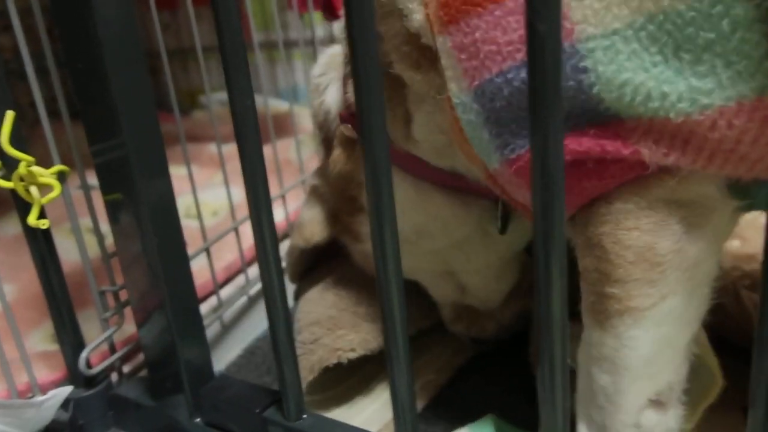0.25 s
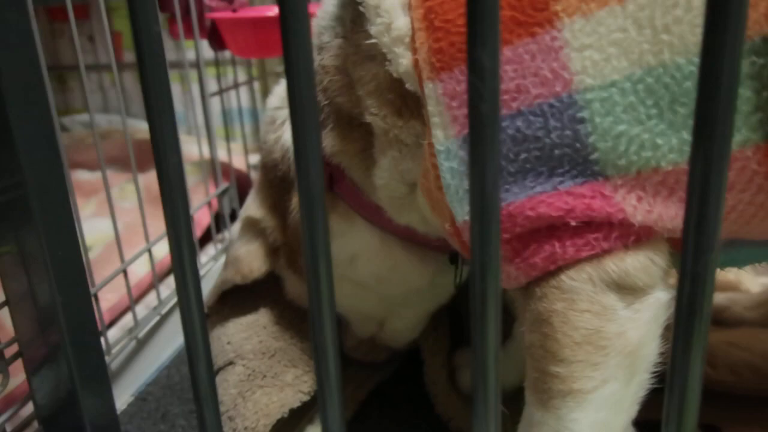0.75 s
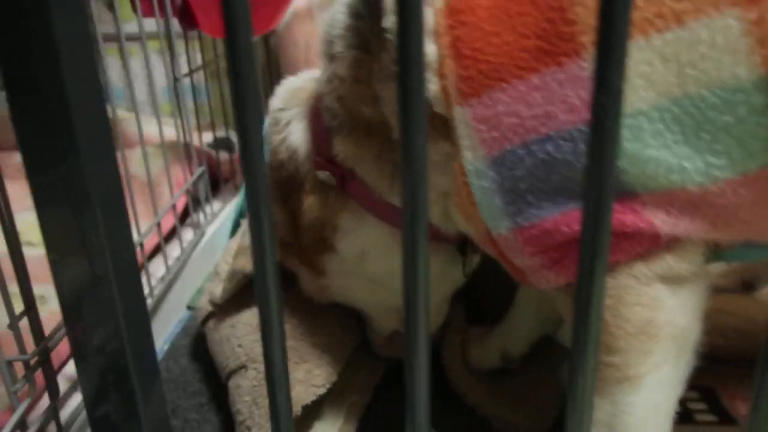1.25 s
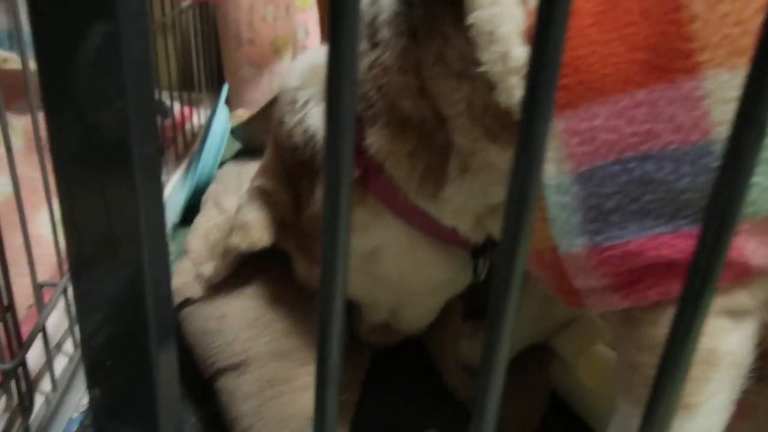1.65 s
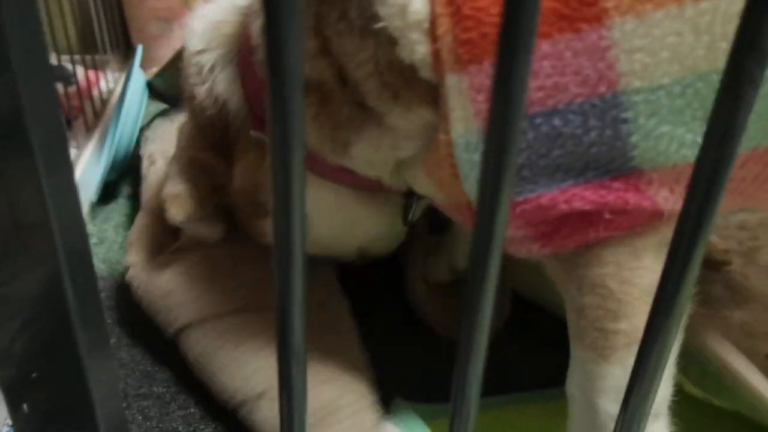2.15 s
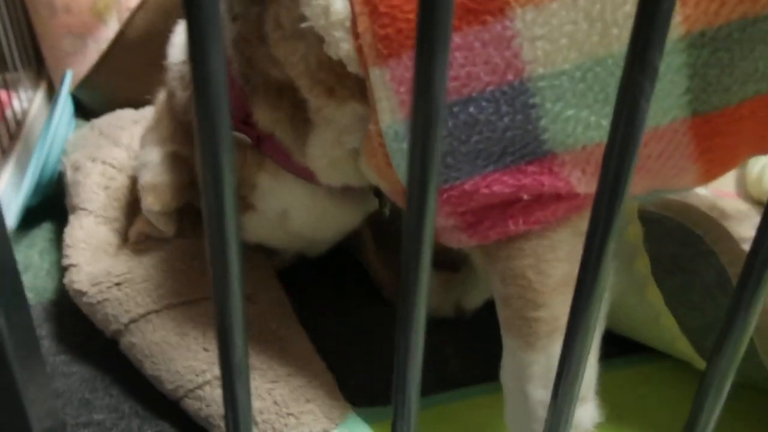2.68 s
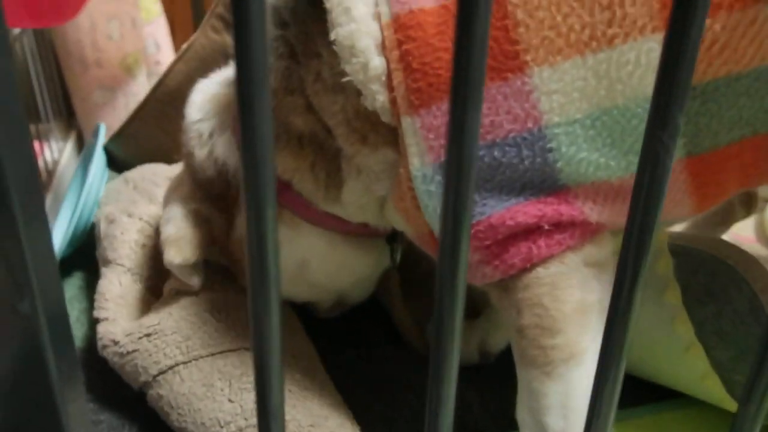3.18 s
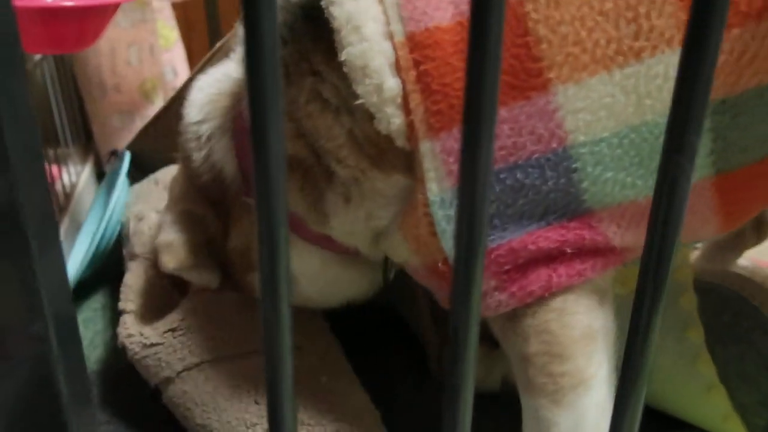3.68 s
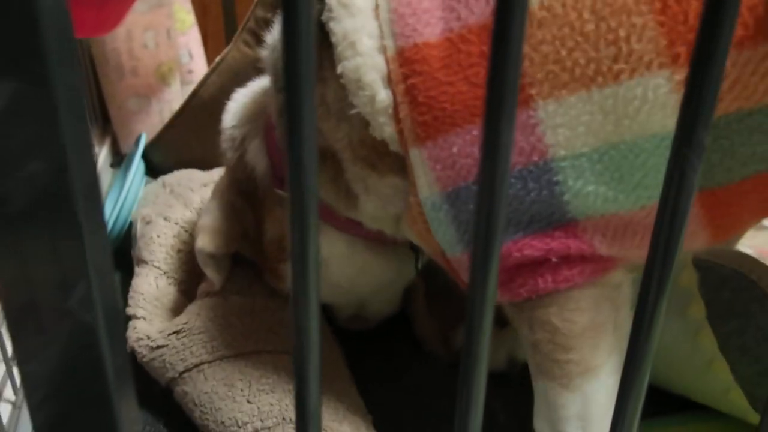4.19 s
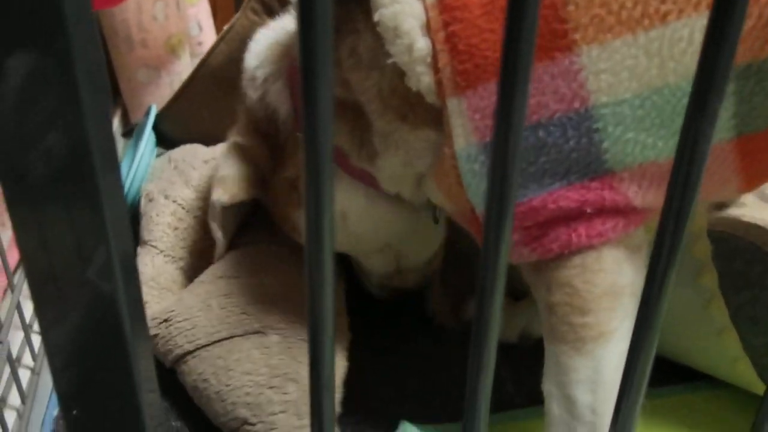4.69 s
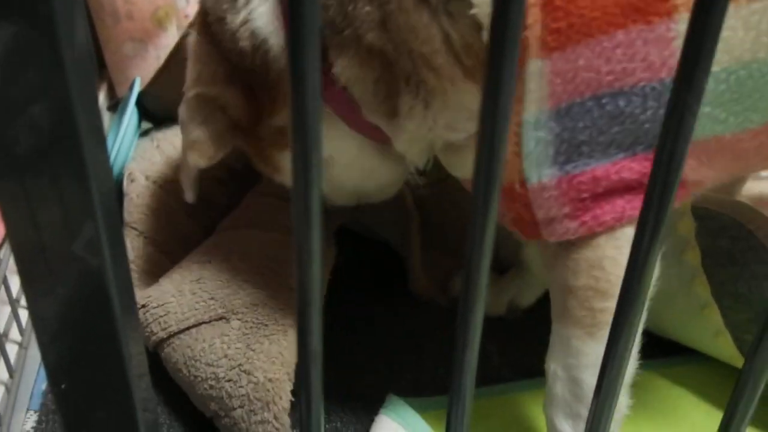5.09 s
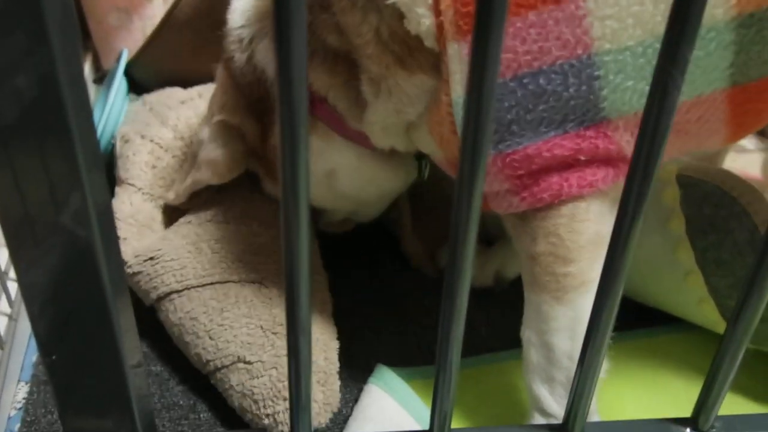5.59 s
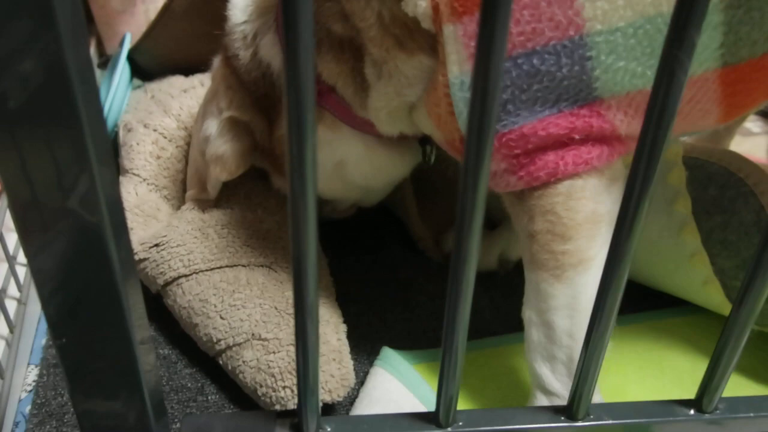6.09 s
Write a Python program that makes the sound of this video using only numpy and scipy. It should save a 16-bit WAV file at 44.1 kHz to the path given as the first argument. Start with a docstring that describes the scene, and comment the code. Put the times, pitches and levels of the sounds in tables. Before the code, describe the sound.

A steady faint hum and airy fan sit behind a dog rooting in bedding. Soft thuds and fleece shuffle come first, then lip smacks and breathy sniffs. The loudest part is cloth jerking and scraping over the hard crate floor, with rapid snaps and rasping weave. Later come sticky mouth clicks, hard snorts and quiet rustle. Close stereo microphone, almost no echo.

```python
"""A dog noses and digs into fleece bedding in a wire crate, indoors, close by, over a steady mains hum and fan.
It opens with a shove of the fleece and soft pats, then small wet nibbles, snuffling and a claw knock.
From about 1.5 s cloth drags and catches on the crate floor, ringing its damped modes, and the weave rasps.
After a second knock near 2.9 s come crackling nibbles, then hard snorts through the nose around 4.5 s.
Sparse wet clicks and faint fleece rustle, made of filtered grains, close the scene."""
import sys
import numpy as np
from scipy import signal
from scipy.fft import rfft, irfft
from scipy.io import wavfile
from scipy.ndimage import uniform_filter1d

SR = 44100
rng = np.random.default_rng(int(sys.argv[2]) if len(sys.argv) > 2 else 0)


def transcribe(signal):
    """Save signal, clipped to [-1, 1], as a 16-bit WAV file at the path in sys.argv[1]."""
    frames = np.atleast_2d(signal).T
    limited = np.clip(frames, -1, 1)
    pcm = np.round(limited * 32767).astype(np.int16)
    wavfile.write(sys.argv[1], SR, pcm)


N = 279798
TIME = np.arange(N) / SR
# In the tables, level_db is a drive level: the playing function adds its own gains.
# Mode tables: side_db is left over right, side_phase_rad is the phase between the sides.


def from_db(db):
    """Decibels to gain."""
    return 10 ** (np.asarray(db) / 20)


def rms_one(x):
    """Scale to unit rms."""
    return x / np.sqrt(np.mean(x ** 2) + 1e-20)


def coloured(x, colour):
    """Give a steady signal a spectrum, drawn through the colour's points on a log-frequency axis; rms 1."""
    hz, db = np.transpose(colour)
    bins = np.maximum(np.arange(N // 2 + 1) * SR / N, 1)
    gain = from_db(np.interp(np.log(bins), np.log(hz), db))
    return rms_one(irfft(rfft(x) * gain, N))


def noise():
    """White noise."""
    return rng.standard_normal(N)


def drift(rate):
    """Smooth random wander of rms 1, with `rate` new points a second."""
    return rms_one(np.interp(TIME * rate, np.arange(N), noise()))


def grains(per_s, spread_db):
    """Fibres let go at random: tiny clicks of either sign and uneven size; rms 1."""
    sizes = from_db(spread_db * np.minimum(rng.exponential(1, N), 4))
    signed = sizes * rng.choice([-1, 1], N)
    return rms_one(signed * (rng.random(N) < per_s / SR))


def clicks(times, heights):
    """One impulse at each time."""
    out = np.zeros(N)
    np.add.at(out, np.round(np.asarray(times) * SR).astype(int), heights)
    return out


def low_pass(x, hz, order=2):
    """Soften above a frequency."""
    return signal.sosfilt(signal.butter(order, min(hz, .45 * SR), fs=SR, output="sos"), x + 1e-18)


def ring(force, hz, db, t60, pan_db, phase):
    """One damped mode, driven by the force near its own pitch; each side gets its own level and phase."""
    near = signal.butter(1, [hz / 2, min(hz * 2, .4 * SR)], "band", fs=SR, output="sos")
    pole = np.exp((2j * np.pi * hz - np.log(1000) / t60) / SR)
    wave = signal.lfilter([from_db(db)], [1, -pole], signal.sosfilt(near, force + 1e-18))
    turn = np.exp(.5j * phase) * from_db(pan_db / 2)
    return np.array([(wave * turn).imag, (wave / turn).imag])


def body(force, modes):
    """All modes of a thing under one force, with alternating sign."""
    return sum((-1) ** k * ring(force, *mode) for k, mode in enumerate(modes))


def damped(modes, cycles):
    """Soft stuff lying against a thing caps every mode's t60 at so many cycles."""
    return [(hz, db, min(t60, cycles / hz), pan_db, phase) for hz, db, t60, pan_db, phase in modes]


def stereo(mid, side):
    """Left and right from what they share and what is opposed."""
    return np.array([mid + side, mid - side])


def swell(start, rise, fall):
    """A rise from silence to a crest of 1 and a fall back."""
    t = TIME - start
    ramp = np.clip(np.minimum(t / rise, (rise + fall - t) / fall), 0, 1)
    return ramp ** 1.32  # above 1: gentle ends and a pointed crest


def pull(start, length, db, db_per_s, attack_s=0.036, release_s=0.0051):
    """The cloth grips quickly, tightens or eases at a steady rate, and is let go."""
    t = TIME - start
    held = from_db(db + db_per_s * np.clip(t, 0, length))
    return held * np.clip(t / attack_s, 0, 1) * np.exp(-np.maximum(t - length, 0) / release_s)


def glide(x, speed):
    """Let a steady sound rise and fall in pitch by a changing factor."""
    return np.interp(np.cumsum(speed) % N, np.arange(N), x)


def evened(x):
    """Hold a narrow noise at a steady loudness, keeping its rough pitch."""
    return x / np.sqrt(uniform_filter1d(x ** 2, size=SR // 70) + 1e-12)


def crumbling(snap, amount, rise_s, fall_s):
    """A contact never parts at once: tiny releases build up to the snap and die away after it."""
    after = signal.lfilter([1], [1, -np.exp(-1 / (fall_s * SR))], snap + 1e-18)
    # run backwards in time, the same decay becomes the build-up
    before = signal.lfilter([1], [1, -np.exp(-1 / (rise_s * SR))], snap[::-1] + 1e-18)[::-1]
    return snap + amount * np.maximum(before, after) * grains(per_s=9000, spread_db=2.0)


def release(t, delay, amount, fall_s):
    """A contact gives way: one snap and a short random spatter, so that no two sound alike."""
    snap = np.arange(len(t)) == round(delay * SR)
    spatter = rng.standard_normal(len(t)) * (t > delay) * np.exp(-np.abs(t - delay) / fall_s)
    return snap + amount * spatter


def room(x, t60, wall_hz, diffuse_hz=220):
    """A short, dull, diffuse tail; the room is too small to scatter the bass."""
    t = np.arange(SR // 2) / SR
    tail = low_pass(rng.standard_normal((2, len(t))), wall_hz, order=1)
    tail = tail * from_db(-60 * t / t60) * (t > .004)
    tail = signal.sosfilt(signal.butter(2, diffuse_hz, "high", fs=SR, output="sos"), tail)
    return signal.fftconvolve(x, tail / np.sqrt(np.sum(tail ** 2) / 2), axes=1)[:, :N]


# Mains hum: freq_hz, rms_db
HUM = [(60, -40), (120, -57)]
# Room air, shared and opposed between the sides: freq_hz, level_db
AIR_MID = [(20, -24), (45, 6.5), (80, 5), (100, -0.5), (160, 0), (240, -8), (400, -1), (620, -13.5),
           (900, -38), (1100, -21), (1300, -11), (1600, -65), (4000, -27), (8000, -35), (15000, -51.5)]
AIR_SIDE = [(30, -46), (100, -19), (160, -10), (240, -6.5), (400, -6.5), (700, -14), (1200, -15),
            (2000, -17.5), (4000, -23), (6500, -26.5), (10000, -32), (15000, -40)]


def background(fan_hz=790, fan_width_hz=42, fan_db=-51, air_mid_db=-50.5, air_side_db=-54):
    """Mains hum as sines, a fan's narrow whirr as resonant noise, and its airy rush as coloured noise."""
    hum = sum(np.sqrt(2) * from_db(db) * np.sin(2 * np.pi * (hz * TIME + rng.random())) for hz, db in HUM)
    whirr = signal.iirpeak(fan_hz, fan_hz / fan_width_hz, fs=SR)
    fan = rms_one(signal.lfilter(*whirr, low_pass(noise(), hz=810)))
    air_mid = from_db(air_mid_db) * coloured(noise(), AIR_MID)
    air_side = from_db(air_side_db) * coloured(noise(), AIR_SIDE)
    return hum + from_db(fan_db) * fan + stereo(air_mid, air_side)


# The dog shoves the fleece about: start_s, length_s, shuffle_level_db, rustle_level_db
SHOVES = [(0.0, 0.17, -37, -45), (0.515, 0.3, -43, -47), (0.708, 0.45, -41.5, -52), (1.106, 0.34, -41, -59),
          (1.37, 0.43, -46.5, -54), (1.64, 0.27, -37.5, -42), (1.763, 0.4, -42.5, -51.5),
          (2.164, 0.26, -39.5, -33.5), (2.355, 0.52, -41.5, -39.5), (3.712, 0.12, -39.5, -46),
          (3.945, 0.58, -46, -58.5), (5.07, 0.58, -50.5, -76), (6.168, 0.064, -41.5, -63)]
# Muffled shuffle and fine rustle of the pile: freq_hz, level_db
SHUFFLE_COLOUR = [(60, -29), (105, -4.5), (140, 4), (165, 7), (195, 0), (245, -10.5), (330, -5.5),
                  (480, -8), (700, -10.5), (1500, -27), (8000, -62)]
RUSTLE_COLOUR = [(60, -50), (200, -49), (700, 2.5), (1250, 4.5), (1800, 2.5), (2150, 0), (3000, -1),
                 (5000, -12), (8000, -21.5), (12000, -35), (16000, -59)]


def fleece(shuffle_db=-2, rustle_db=-5, rustle_side_db=0, lumpy_db=2.7):
    """The pile gives way with a muffled shuffle and a grainy rustle: faintly all the time, more at each shove."""
    stir = from_db(0.33 * drift(21))  # the fleece never lies quite still
    shuffle, rustle = from_db(-52.5) * stir, from_db(-56.5) * stir
    for start, length, low_db, high_db in SHOVES:
        # half of each shove is spent rising, half falling
        push = np.clip(np.minimum(TIME - start, start + length - TIME) / (0.5 * length), 0, 1)
        shuffle = np.hypot(shuffle, from_db(low_db) * push)
        rustle = np.hypot(rustle, from_db(high_db) * push)
    mid, side = (coloured(grains(per_s=3800, spread_db=3.0), RUSTLE_COLOUR) for _ in range(2))
    folds = from_db(shuffle_db + lumpy_db * drift(35)) * shuffle * coloured(noise(), SHUFFLE_COLOUR)
    return folds + from_db(rustle_db) * rustle * stereo(mid, from_db(rustle_side_db) * side)


# Fur brushes the fleece in thin, high wisps: start_s, length_s, level_db
WISPS = [(1.44, 0.096, -61), (2.168, 0.065, -54), (2.325, 0.15, -53.5), (3.014, 0.059, -53.5),
         (3.272, 0.035, -55)]
# Thin hair-tip spectrum: freq_hz, level_db
WISP_COLOUR = [(5000, -25), (9000, 3), (13500, -3), (16000, -10)]


def wisps(level_db=0):
    """Hair tips flick over the fleece with a fine, high grain, separate on each side."""
    touch = sum(from_db(db) * swell(start, length / 2, length / 2) for start, length, db in WISPS)
    hairs = np.array([coloured(grains(per_s=6700, spread_db=8), WISP_COLOUR) for _ in range(2)])
    return from_db(level_db) * touch * hairs


# The muzzle brushes loosely over the folds: start_s, length_s, level_db
BRUSHES = [(0.585, 0.1, -44), (1.419, 0.085, -41.5), (1.715, 0.09, -39.5), (1.77, 0.14, -48.5),
           (2.588, 0.17, -39), (2.967, 0.1, -41), (3.061, 0.16, -48), (4.015, 0.09, -50.5)]
# Broad rustle of loose folds: freq_hz, level_db
BRUSH_COLOUR = [(300, -9), (700, 12), (1050, -8), (1400, 3), (1800, 6), (2200, -7), (3100, -4),
                (4500, -12.5), (8000, -32.5), (15000, -36)]


def brushes(level_db=0, side_db=-5):
    """Loose folds slide under the muzzle with a broad, grainy rustle."""
    touch = sum(from_db(db) * swell(start, length / 2, length / 2) for start, length, db in BRUSHES)
    mid, side = (coloured(grains(per_s=2500, spread_db=3), BRUSH_COLOUR) for _ in range(2))
    return from_db(level_db) * touch * stereo(mid, from_db(side_db) * side)


# The muzzle rubs over the pile with a soft groan: start_s, length_s, level_db, first_pitch_hz, last_pitch_hz
RUBS = [(0.691, 0.092, -39.5, 448, 306), (1.418, 0.032, -26.5, 372, 426), (2.118, 0.047, -27.5, 469, 475),
        (4.015, 0.022, -36.5, 483.4, 425), (4.852, 0.086, -41.5, 562, 276)]
# The groan's spectrum at its reference pitch of 400 Hz: freq_hz, level_db
RUB_COLOUR = [(200, -36), (340, -4), (400, 4.5), (470, -16), (800, -12), (1600, -56)]


def rubs(level_db=0, reference_hz=400):
    """Uneven stick and slip on the pile: a rough, narrow tone whose pitch follows the speed of the muzzle."""
    tone = evened(coloured(noise(), RUB_COLOUR))
    out = 0
    for start, length, db, first_hz, last_hz in RUBS:
        hz = np.interp(TIME, [start, start + length], [first_hz, last_hz])
        touch = from_db(db + level_db) * swell(start, length / 2, length / 2)
        out = out + touch * glide(tone, hz / reference_hz)
    return out


def blows(table, modes):
    """Cloth crumples under each blow and rounds it: the softer the contact, the duller the body answers."""
    force = sum(low_pass(clicks([s], from_db(db)), hard_hz, order=2) for s, db, hard_hz in table)
    t = np.arange(SR // 50) / SR
    crumple = release(t, 0, amount=.05, fall_s=.003)
    return body(signal.fftconvolve(force, crumple)[:N], modes)


# Muzzle and paws pat the padding: start_s, level_db, hardness_hz
BUMPS = [(0.027, -18, 490), (0.04, -19.5, 504), (0.086, -7, 187), (0.45, -26, 1510), (0.647, -23.5, 1400),
         (0.83, -32, 1400), (1.4495, -21.5, 900), (1.457, -26, 700), (2.603, -19.5, 1100),
         (2.754, -22.5, 1400), (3.238, -22, 1200), (4.031, -15, 864)]
# The padding under a pat: pitch_hz, level_db, t60_s, side_db, side_phase_rad
BUMP_MODES = [(145, -7.5, 0.02, 0, 0), (331, -6.5, 0.016, -2, 0), (700, 4.5, 0.0059, -1, 0),
              (867, -3, 0.018, 0, 0)]
# Claws knock through to the crate floor: start_s, level_db, hardness_hz
KNOCKS = [(0.7872, -28, 7000), (2.9012, -17, 2600)]
# The floor under a claw: pitch_hz, level_db, t60_s, side_db, side_phase_rad
KNOCK_MODES = [(144, -2.5, 0.023, 1, 0.36), (298, -4.5, 0.029, 7.5, 0.56), (415, -5, 0.072, 3, 1.2),
               (710, 3, 0.0084, 0, 0.19), (900, 5.5, 0.0045, -1, 1.1), (1280, -4.5, 0.028, 1, 1.3),
               (1680, 5.5, 0.0067, 2, 1.1), (1790, 2, 0.019, -2, 0.51), (2440, -4.5, 0.014, -4, 2.3),
               (3340, -2.5, 0.011, 0, 0.61), (4340, 8, 0.0016, -6.5, 2), (7340, 3, 0.001, 8, 3.33)]


def bumps(pat_db=-1, knock_db=0):
    """Soft pats ring the bedding; claw knocks ring the floor below it."""
    return from_db(pat_db) * blows(BUMPS, BUMP_MODES) + from_db(knock_db) * blows(KNOCKS, KNOCK_MODES)


# The weave rasps where it is drawn taut: start_s, length_s, start_level_db, growth_db_per_s
RASPS = [(0.59, 0.041, -56, 0), (2.362, 0.16, -45.5, 25), (2.491, 0.086, -40.5, 10), (2.569, 0.21, -42, -1)]
# The rasp's resonances: pitch_hz (before the stretch), level_db, t60_s, side_db, side_phase_rad
RASP_MODES = [(1300, -1, 0.016, 1, 1), (1777, -2.5, 0.031, 4, 0.95), (2490, -4.5, 0.015, 3, 0.68),
              (2880, 4, 0.0089, 2, 0.6), (3450, 3, 0.012, -0.5, 3), (4000, 1, 0.0086, 8, 1.1),
              (7060, -1, 0.0027, -2, 2.2)]


def rasp(level_db=0, patchy_db=2.2, wander_db=1.2, stretch=.025):
    """Threads are plucked in small catches; the resonances wander in strength and pitch as the weave stretches."""
    threads = grains(per_s=4000, spread_db=2.5) * from_db(patchy_db * drift(300))
    sound = 0
    for k, mode in enumerate(RASP_MODES):
        sound = sound + (-1) ** k * ring(threads * from_db(wander_db * drift(25.03)), *mode)
    speed = 1 + stretch * drift(30)
    stretched = rms_one(np.array([glide(side, speed) for side in sound]))
    return from_db(level_db) * sum(pull(*row) for row in RASPS) * stretched


# Teeth and tongue work the fleece: start_s, length_s, level_db
GNAWING = [(0.702, 0.042, -44), (0.853, 0.047, -49), (1.1, 0.025, -49), (3.73, 0.045, -37),
           (3.833, 0.037, -45.5), (3.901, 0.022, -53), (3.973, 0.04, -38.5), (4.15, 0.048, -46),
           (4.251, 0.19, -58), (5.405, 0.025, -44), (5.54, 0.018, -47), (6.165, 0.042, -51)]
# The mouth's hollow: pitch_hz, level_db, t60_s, side_db, side_phase_rad
MOUTH_MODES = [(1800, 15, 0.044, 1.5, 1.75), (2460, 9, 0.018, 7, 1.1), (3240, 18.5, 0.0016, 4, 2),
               (4240, 8.5, 0.0049, 0, 1.4)]


def gnawing(level_db=-1):
    """Clumps of tiny sticky releases crackle in the mouth's hollow."""
    effort = sum(from_db(db) * swell(start, length / 2, length / 2) for start, length, db in GNAWING)
    releases = grains(per_s=900, spread_db=2.5) * from_db(3 * drift(150))
    return from_db(level_db) * effort * rms_one(body(releases, MOUTH_MODES))


# Wet smacks, lips first and then tongue:
# start_s, lips_level_db, tongue_level_db, sticky_edge_level_db, cavity_pitch_hz, tongue_t60_s
NIBBLES = [(0.169, -39.5, -63, -48, 1700, 0.016), (0.7033, -29, -30, -43.5, 1800, .015),
           (0.897, -55, -38, -58, 1800, 0.028), (0.938, -30.5, -48, -38.5, 1820, .014),
           (0.969, -39, -60, -46, 1780, .008), (1.04, -34, -55, -41, 1800, 0.017),
           (1.1025, -40, -31, -39, 1790, 0.027), (1.9382, -30, -34, -33, 1690, 0.0087),
           (3.744, -32, -40, -52, 1864, 0.013), (3.84, -43, -35.5, -44, 1800, 0.017),
           (3.908, -34, -60, -51, 1777, .014), (3.972, -31.5, -34, -46, 1810, 0.031),
           (4.139, -40.5, -22.5, -47, 1630, 0.015), (4.2395, -34, -43, -47, 1790, 0.016),
           (4.3422, -25, -43, -42, 1740, 0.02), (5.135, -25.5, -57, -36, 1795, 0.0086),
           (5.2065, -40.5, -60, -58, 1800, .01), (5.4057, -40, -32, -42.5, 1780, 0.016),
           (5.54, -38, -40, -40, 1790, 0.016), (6.136, -32, -52, -47.5, 1800, 0.023),
           (6.167, -57, -41.5, -68, 1800, 0.031)]
# The edge of a click: pitch_hz, level_db, t60_s (before damping), side_db, side_phase_rad
EDGE_MODES = [(1190, -4, 0.036, -8, 0.88), (2270, 4.5, 0.018, 9, 0.67), (3440, 7, 0.0031, 3, 1.84),
              (5270, 6, 0.002, 1, 1.68), (7000, -4.5, 0.0032, 2, 1.4), (10850, -4.5, 0.012, 0, 1.6)]
TONGUE_DELAY_S, LIPS_T60_S = 0.011, 0.007
LIPS_PITCH_RATIO = 1.33  # the gap of the lips rings higher than the whole mouth
TONGUE_UPPER_RATIO, TONGUE_UPPER_DB = 1.38, -3  # a second, higher ring of the tongue
TONGUE_EDGE_DB = -27  # the tongue's edge is far softer than its ring


def nibbles(cavity_db=-1, edge_db=-3, jaw_db=-13):
    """Lips part with a sharp, sticky edge and the tongue follows; each rings the mouth above a low jaw knock."""
    lips_s, lips_db, tongue_db, sticky_db, mouth_hz, t60 = np.transpose(NIBBLES)
    s = np.r_[lips_s, lips_s + TONGUE_DELAY_S]
    db = np.r_[lips_db, tongue_db]
    cavity = np.zeros((2, N))
    t = np.arange(SR // 10) / SR
    for k, at in enumerate(np.round(lips_s * SR).astype(int)):
        lips, tongue = (release(t, delay, amount=0.11, fall_s=0.0014) for delay in (0, TONGUE_DELAY_S))
        rings = [(lips, LIPS_PITCH_RATIO, lips_db[k], LIPS_T60_S),
                 (tongue, 1, tongue_db[k], t60[k]),
                 (tongue, TONGUE_UPPER_RATIO, tongue_db[k] + TONGUE_UPPER_DB, LIPS_T60_S)]
        for force, ratio, level, decay in rings:
            smack = ring(force, ratio * mouth_hz[k], level + cavity_db, decay, pan_db=-1.0, phase=0.95)
            cavity[:, at:at + len(t)] += smack
    sharp_db = np.r_[sticky_db, tongue_db + TONGUE_EDGE_DB]
    parting = crumbling(clicks(s, from_db(sharp_db + edge_db)), amount=0.17, rise_s=0.0007, fall_s=0.0016)
    edge = body(parting, damped(EDGE_MODES, cycles=13))
    jaw = ring(clicks(s, from_db(db)), hz=631, db=jaw_db, t60=0.051, pan_db=1, phase=.2)
    return cavity + edge + jaw


# Puffs through the dog's nose:
# start_s, rise_s, fall_s, nostril_level_db, muzzle_level_db, hiss_level_db, crest_lift_semitones (above slack)
SNUFFLES = [(0.589, 0.035, 0.068, -38, -39, -64, 3), (0.639, 0.015, 0.053, -37.5, -55, -73, 2),
            (1.441, 0.0085, 0.081, -35, -36.5, -56, 2), (2.559, 0.068, 0.24, -37.5, -40, -71, 2),
            (2.655, 0.029, 0.069, -42, -40, -57.5, 1.5), (2.7, 0.059, 0.042, -30.5, -54, -58, 2),
            (2.97, 0.027, 0.15, -46.5, -38.5, -66, 0.5), (3.232, 0.016, 0.052, -39, -38.5, -62.5, 1.5),
            (3.75, 0.06, 0.11, -46, -51, -64, 2), (3.997, 0.0591, 0.095, -37.5, -40, -58, 0.5),
            (4.459, 0.061, 0.066, -36, -39, -52, 2), (4.525, 0.069, 0.055, -27, -39.5, -46, 2.5),
            (4.6, 0.03, 0.061, -28.5, -43.5, -43.5, 2.5), (4.632, 0.041, 0.15, -42, -40.5, -60.5, 2),
            (4.829, 0.027, 0.28, -74, -55, -64.5, -3)]
# Nostril and muzzle hollows, hiss, and the top of a hard snort: freq_hz, level_db
NOSTRIL_COLOUR = [(200, -88), (520, -8), (640, 4.5), (750, 2), (850, -2), (980, -9), (1120, -20.5),
                  (1400, -17.5), (2200, -25), (4000, -26.5), (9000, -70)]
MUZZLE_COLOUR = [(100, -61), (240, -13), (350, -5), (470, -6.5), (600, -60), (1500, -69)]
HISS_COLOUR = [(500, 20.5), (1500, -32), (3300, -4), (4500, 14), (6400, 14), (7800, 7.5), (10000, 5),
               (12000, -4), (15000, -31)]
JET_COLOUR = [(5000, -30), (8000, -7), (10300, 7), (11500, -8), (14000, -8), (16000, -32)]
SLACK_SEMITONES = -1.5  # the nostrils ring lower when little air flows


def snuffles(nostril_db=1, muzzle_db=-2.0, hiss_db=2, flutter_db=1.5, jet_db=-2):
    """Nose puffs, straight ahead: two hollow resonances and a hiss; the nostrils' pitch bends with each puff."""
    rows = np.array(SNUFFLES)
    puffs = np.array([swell(start, rise, fall) for start, rise, fall, *_ in SNUFFLES])
    nostril, muzzle, hiss = from_db(rows[:, 3:6]).T @ puffs
    pitch = 2 ** ((SLACK_SEMITONES + rows[:, 6] @ puffs) / 12)
    nose = from_db(nostril_db) * nostril * glide(evened(coloured(noise(), NOSTRIL_COLOUR)), pitch)
    hollow = from_db(muzzle_db) * muzzle * coloured(noise(), MUZZLE_COLOUR)
    hiss_noise = stereo(coloured(noise(), HISS_COLOUR), .5 * coloured(noise(), HISS_COLOUR))
    air = from_db(hiss_db) * hiss * hiss_noise
    # a faster jet is brighter: the top grows more steeply than the rest of the hiss
    jet_noise = stereo(coloured(noise(), JET_COLOUR), .5 * coloured(noise(), JET_COLOUR))
    jet = from_db(jet_db) * hiss * np.sqrt(hiss / hiss.max()) * jet_noise
    return (nose + hollow + air + jet) * from_db(flutter_db * drift(110))


# The dog pulls cloth over the floor: start_s, length_s, start_level_db, growth_db_per_s
PULLS = [(1.686, 0.073, -52, 220), (1.742, 0.29, -38.5, -76), (2.088, 0.064, -36, 84),
         (2.169, 0.186, -38.5, 53), (2.365, 0.41, -44, -4)]
# Friction force of the cloth: freq_hz, level_db
DRAG_COLOUR = [(150, 12), (400, 4.5), (1100, -4), (1700, -1.5), (3000, -6), (4300, 1), (6500, -1.5),
               (12500, 0), (15000, -9)]
# Crate floor, also rung by the slips: pitch_hz, level_db, t60_s (before damping), side_db, side_phase_rad
FLOOR_MODES = [(155, -27, 0.019, 5, 0.092), (296, -23, 0.0062, 13, 0.26), (444, -6.5, 0.055, 2, 0.79),
               (606, -14, 0.049, 4, 0.18), (739, -6, 0.071, 0.5, 0.097), (1110, -3.5, 0.018, 8.5, 0.29),
               (1390, -8, 0.0091, -3, 3.14), (1710, -6.5, 0.026, 6.5, 1.8), (2610, 2.5, 0.0083, 2.5, 2.42),
               (3300, 1, 0.0073, -0.5, 2.75), (3970, 2.5, 0.0029, 0, 2.4), (6880, -3.5, 0.0042, 0.5, 1.91),
               (11700, -0.5, 0.0022, 0, 2.78)]
FLOOR_RING_CYCLES = 21


def drag(level_db=3.5, patchy_db=2.5, catch_db=-2):
    """Dense fibre friction and sparser small catches keep the crate floor's modes sounding."""
    pressure = sum(pull(*row) for row in PULLS)
    catches = from_db(catch_db) * grains(per_s=340, spread_db=-3.5)
    fibres = grains(per_s=3800, spread_db=2.0) + catches
    friction = coloured(fibres, DRAG_COLOUR) * from_db(patchy_db * drift(90))
    return from_db(level_db) * pressure * rms_one(body(friction, damped(FLOOR_MODES, FLOOR_RING_CYCLES)))


# Cloth catches and lets go on the crate floor:
# start_s, level_db, bass_db and treble_db (both relative to level_db)
SLIPS = [(1.537, -18, -3.5, -9.5), (1.7496, -4, -5, -6), (1.778, -10, 0, -6.5), (1.8297, -15.5, 0.5, -11.5),
         (1.888, -18, -2, -14), (1.973, -20, -2.5, -15), (2.124, -10, -4, -15), (2.1355, -13.5, -1, -11),
         (2.148, -12, 2, -9.5), (2.1934, -23, -2, -12), (2.203, -14.5, 1, -7), (2.2303, -14.5, 1.5, -8),
         (2.257, -18, 3.5, -12), (2.282, -10, 1, -10.5), (2.3005, -6, 0.5, -6), (2.3143, -5.5, 3, -10),
         (2.32, -6, 0.5, -2.5), (2.3272, -8, 1, -10), (2.334, -11, 0, -8), (2.3419, -15, 8, -13),
         (2.3503, -18, -1, -0.5), (2.432, -25, -2, -1), (2.469, -29, 2, 6), (2.493, -30, 6, 1),
         (2.678, -25, 3, -9), (2.716, -25, 0, -17)]


def slips(level_db=-6.0, treble_snap_db=-1, top_hz=13300):
    """Each slip thumps the lowest floor modes, snaps the middle ones and strikes the high ones with a crunch."""
    s, db, bass_db, treble_db = np.transpose(SLIPS)
    thump, snap = (crumbling(clicks(s, from_db(level)), amount=.04, rise_s=.002, fall_s=.004)
                   for level in (db + bass_db, db))
    crunch_db = db + treble_db + treble_snap_db
    crunch = crumbling(clicks(s, from_db(crunch_db)), amount=.13, rise_s=.0006, fall_s=.0013)
    out = 0
    for k, mode in enumerate(damped(FLOOR_MODES, FLOOR_RING_CYCLES)):
        force = thump if mode[0] < 900 else snap if mode[0] < 2100 else crunch
        # each mode's drive wanders on its own
        out = out + (-1) ** k * ring(force * from_db(drift(40)), *mode)
    return from_db(level_db) * low_pass(out, top_hz, order=8)


def scene(room_db=-16):
    """The dog and its bedding with a short room tail, over the hum and fan."""
    bedding = fleece() + wisps() + brushes() + rubs() + bumps() + rasp()
    mouth_and_nose = gnawing() + nibbles() + snuffles()
    dog = bedding + mouth_and_nose + drag() + slips()
    return dog + from_db(room_db) * room(dog, t60=0.054, wall_hz=4800) + background()


def record(dry):
    """The top is cut steeply above 15.4 kHz."""
    return signal.sosfilt(signal.ellip(10, .1, 90, 15400, fs=SR, output="sos"), dry)


dry = scene()
out = record(dry)
transcribe(out)
```